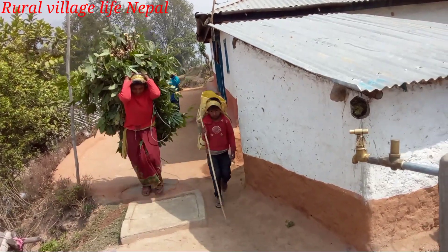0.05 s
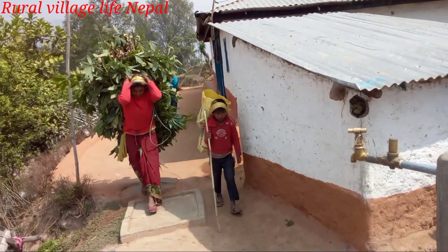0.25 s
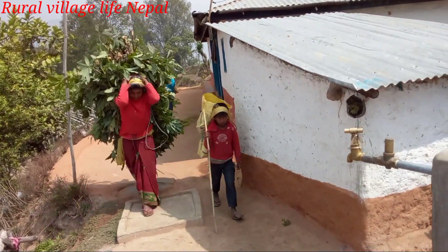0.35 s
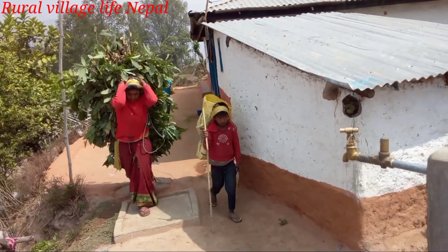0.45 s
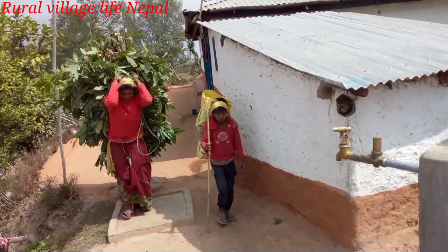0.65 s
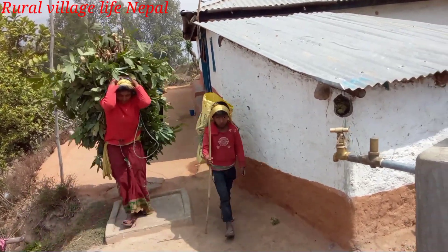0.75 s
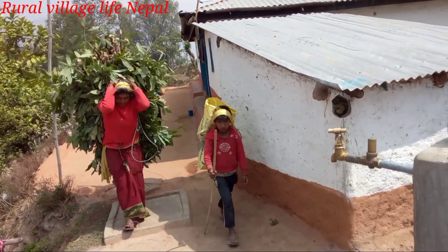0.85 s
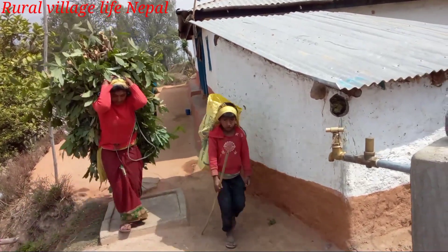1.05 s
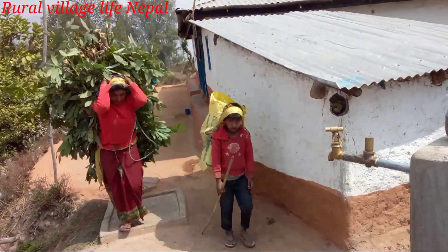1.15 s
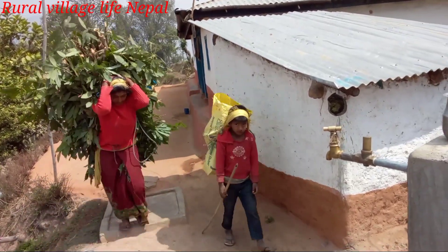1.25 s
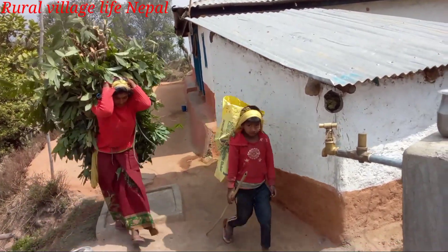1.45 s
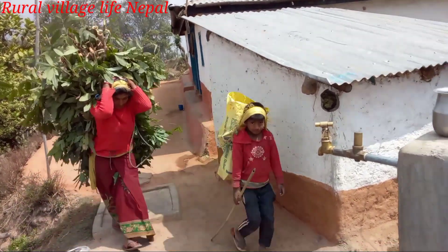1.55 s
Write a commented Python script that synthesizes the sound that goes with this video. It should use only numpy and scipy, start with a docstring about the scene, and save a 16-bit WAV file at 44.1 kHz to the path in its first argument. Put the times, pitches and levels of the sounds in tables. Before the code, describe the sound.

A goat gives one long, high, quavering bleat in a quiet village yard, and a lower, farther goat joins softly as it ends. Sandals slap and scuff on a gritty path, and soft low bumps hit the microphone.

```python
"""Two goats in a village yard.

A goat gives one long, high, quavering bleat, ten throbs a second, its vocal folds buzzing through a mouth
that opens and closes again; a second, lower goat joins in softly as it ends. House walls throw the calls
back. Feet slap and scuff on the gritty path, and soft low buffets hit the microphone in the quiet air."""
import sys
import numpy as np
from scipy import signal
from scipy.fft import rfft, irfft, next_fast_len
from scipy.io import wavfile

SR = 44100
rng = np.random.default_rng(int(sys.argv[2]) if len(sys.argv) > 2 else 0)


def dump_mix(stems):
    """Bounce the given channels to the path in sys.argv[1] as a 16-bit WAV at rate SR."""
    frames = np.atleast_2d(stems).T  # one column per channel
    limited = np.clip(frames, -1, 1)  # hard clip at full scale
    pcm = np.round(limited * 32767).astype(np.int16)
    wavfile.write(sys.argv[1], SR, pcm)


N = 68355
T = np.arange(N) / SR
SIZE = next_fast_len(N + SR // 2)
HZ = np.maximum(np.arange(SIZE // 2 + 1) * SR / SIZE, 1)
CUTOFF_HZ = 15500
JITTER_HZ = 294   # bandwidth of the pitch tremor in both voices


def from_db(db):
    """Decibels to gain."""
    return 10 ** (np.asarray(db) / 20)


def colour_db(points, hz=HZ):
    """A spectrum in dB, its points joined by straight lines in log frequency."""
    f, db = np.transpose(points)
    return np.interp(np.log(hz), np.log(f), db)


def shape(x, db):
    """Causal (minimum-phase) filter with the given gains; the result has rms 1."""
    cepstrum = irfft(db * np.log(10) / 20, SIZE)
    cepstrum[1:SIZE // 2] *= 2
    cepstrum[SIZE // 2 + 1:] = 0
    y = irfft(rfft(x, SIZE) * np.exp(rfft(cepstrum)), SIZE)[:N]
    return y / y.std()


def noise(points, hz=HZ):
    """Coloured noise, rms 1."""
    return shape(rng.standard_normal(N), colour_db(points, hz))


def drift(hz):
    """Random wander below the given rate, spread 1."""
    y = signal.sosfilt(signal.butter(2, hz, fs=SR, output="sos"), rng.standard_normal(N))
    return y / y.std()


def swell(s, width):
    """A bell-shaped rise and fall around second s."""
    return np.exp(-.5 * ((T - s) / width) ** 2)


def strikes(rows):
    """Envelope of blows: instant attack, exponential decay."""
    return sum(from_db(db) * (T >= s) * np.exp(-np.maximum(T - s, 0) / decay) for s, db, decay in rows)


def background():
    """Still outdoor air, a faint rustle of leaves and low rumble on the microphone."""
    # Spectra of the three beds. Each row: frequency in Hz, level in dB.
    air_colour = [(20, -26), (60, 5.5), (150, -14), (290, -9), (420, -16), (1400, -16), (3000, -20.5),
                  (8000, -34.5), (15500, -29.5)]
    leaf_colour = [(300, 16.5), (900, 7.5), (1400, 5), (2000, 7.5), (4000, 10), (7000, -8), (15500, -9)]
    rumble_colour = [(20, -20), (45, 11.5), (65, 11), (130, -10), (220, -31), (500, -45), (2000, -83)]
    # How leaves and rumble rise and fall. Each row: time in seconds, level in dB.
    leaf_levels = [(0, -116), (.3, -64), (.6, -54), (1.1, -55), (1.55, -56)]
    rumble_levels = [(0, -74), (.2, -75), (.5, -50.5), (.85, -45.5), (1.05, -53.5), (1.25, -86),
                     (1.55, -64)]
    air = from_db(-60) * noise(air_colour)
    leaves = from_db(np.interp(T, *np.transpose(leaf_levels))) * noise(leaf_colour)
    rumble = from_db(np.interp(T, *np.transpose(rumble_levels))) * noise(rumble_colour)
    return air + leaves + rumble


def buffets():
    """Short, dull bumps right on the microphone: a wavering low swing in noise."""
    # Each row: crest in seconds, level at the crest in dB, half-length in seconds, centre in Hz.
    bumps = [(0.223, -44.5, 0.026, 73.9), (.258, -20.5, 0.012, 112.8), (0.306, -36.5, 0.012, 133.2),
             (0.363, -17.5, .015, 125), (0.396, -34.5, 0.051, 110.7), (0.481, -26, 0.0086, 73.26),
             (0.593, -29.5, 0.011, 120), (0.623, -31.5, 0.034, 90), (0.688, -30, 0.012, 105),
             (0.839, -36, 0.024, 106.4), (1.002, -44.5, 0.014, 129.7), (1.153, -39, 0.031, 89.5),
             (1.522, -49, 0.02, 62.7)]
    # Spectrum of the noise. Each row: multiple of the centre frequency, level in dB.
    bump_colour = [(.2, -61), (.5, -14.5), (1, -5), (1.5, -15.5), (2.4, -16), (3.8, -33.5), (6, -53),
                   (30, -107)]
    out = 0
    waver = np.exp(.25 * drift(hz=48.4))
    for s, db, length, hz in bumps:
        envelope = swell(s, length)
        swing = np.sqrt(2) * np.sin(2 * np.pi * (hz * np.cumsum(waver) / SR + rng.random()))
        burst = envelope * (swing + from_db(-1) * noise(bump_colour, HZ / hz))
        out += from_db(db) * burst * np.linalg.norm(envelope) / np.linalg.norm(burst)
    return out


def footfalls():
    """A sandal slaps down, grit snaps and light taps ring on the path; each dies at once."""
    # Slaps and snaps. Each row: start in seconds, level in dB, decay in seconds.
    slap_hits = [(.3998, -27.5, 0.0072), (.407, -35, 0.0046), (.4168, -30, 0.0022)]
    snap_hits = [(.136, -75, .002), (.155, -47, 0.0015), (.657, -40.5, 0.0022), (1.147, -45, 0.0036),
                 (1.425, -53.5, 0.007), (1.436, -71, .003)]
    # Their spectra. Each row: frequency in Hz, level in dB.
    slap_colour = [(300, -22), (800, -6.5), (1700, -9), (2150, -1), (2500, 9), (3100, -1), (5000, -7),
                   (8000, -27), (10500, -15.5), (15500, -31)]
    snap_colour = [(700, -11), (1500, 8.5), (5000, -1.5), (7000, -1), (10000, -4), (15000, -9)]
    # Taps. Each row: start in seconds, level in dB, ring in Hz.
    tap_hits = [(.154, -53.5, 970), (0.297, -50, 1230)]
    # Spectrum of a tap. Each row: multiple of the ring frequency, level in dB.
    tap_colour = [(.4, -32), (.8, -20), (1, 3), (1.25, -22), (3, -33)]
    tap_decay_s = .0034
    slaps = noise(slap_colour) * strikes(slap_hits)
    snaps = noise(snap_colour) * strikes(snap_hits)
    taps = sum(noise(tap_colour, HZ / hz) * strikes([(s, db, tap_decay_s)]) for s, db, hz in tap_hits)
    return slaps + snaps + taps


def scuffs():
    """Soles drag over the gritty path: short, flat-topped strokes of grainy noise."""
    # Each row: middle in seconds, level in dB, half-length in seconds.
    strokes = [(0.42, -43.5, 0.023), (0.469, -47, 0.025), (0.901, -41, 0.019), (0.943, -36, 0.025)]
    # Spectrum of the scrape. Each row: frequency in Hz, level in dB.
    scrape_colour = [(250, -12.5), (380, 6.5), (560, -7.5), (900, -9.5), (1600, 2.5), (2400, 9.5),
                     (4000, 2.5), (6000, -4), (8000, -8), (12000, -4), (15500, -12.5)]
    envelope = sum(from_db(db) / (1 + ((T - s) / length) ** 10) for s, db, length in strokes)
    return noise(scrape_colour) * from_db(.5 * drift(hz=398)) * envelope


def yard(call, tail_db):
    """A call reaches the microphone directly, off the house walls and as a short diffuse tail."""
    # Wall echoes. Each row: delay in seconds, level in dB.
    echoes = [(.0115, -14), (.021, -14.5), (.043, -44)]
    t60_s, hollow_delay_s, hollow_band_hz = .33, .028, (580, 872)
    tail = rng.standard_normal(N) * from_db(-60 * T / t60_s) * (T > echoes[0][0])
    response = from_db(tail_db) * tail / np.linalg.norm(tail)
    for s, db in echoes:
        response[int(s * SR)] += from_db(db)
    # One stronger reflection sounds hollow.
    band = signal.butter(2, hollow_band_hz, "band", fs=SR, output="sos")
    bounce = signal.unit_impulse(N, int(hollow_delay_s * SR)) + 1e-18
    response += from_db(-6) * signal.sosfilt(band, bounce)
    return call + signal.fftconvolve(call, response)[:N]


def folds(pitch):
    """Vocal-fold pulses: all harmonics at equal strength."""
    phase = 2 * np.pi * np.cumsum(pitch) / SR
    count = int(CUTOFF_HZ / np.median(pitch))
    half = np.sin(phase / 2)
    return np.sin((count + .5) * phase) / np.where(half == 0, 1, half) - 1


def low_goat():
    """The farther goat, nearly an octave lower: throbs lift pitch and level; a nasal hum joins them."""
    # Each row: crest in seconds, top pitch in Hz, level in dB, half-length in seconds.
    throbs = [(1.079, 228, -44.5, 0.022), (1.175, 257.7, -40, 0.019), (1.274, 262, -43.5, 0.029),
              (1.366, 263.3, -43.5, 0.042), (1.469, 260, -44, 0.042)]
    # Spectra of its mouth and breath. Each row: frequency in Hz, level in dB.
    mouth_colour = [(250, -2.5), (520, 3.5), (780, 5), (1050, -12), (1550, -15.5), (2000, -17), (2300, 0),
                    (2600, -12), (2900, -11.5), (3250, 0.5), (3500, -14.5), (3950, -16.5), (4600, -48),
                    (5400, -18), (6500, -61), (15000, -63)]
    breath_colour = [(250, 11), (500, 18), (950, 26), (1200, -29), (1800, -2), (2300, -18), (2650, 3),
                     (3200, 2), (3500, -11), (4000, -2), (4700, -16), (5500, 3), (6500, -40), (15000, -31)]
    rest_hz, pitch_lag_s, jitter = 228, .00702, .006

    def level(spread):
        return sum(from_db(db - 11.5 * ((T - s) / (length * spread)) ** 2) for s, _, db, length in throbs)

    lift_hz = sum((hz - rest_hz) * swell(s + pitch_lag_s, width=.025) for s, hz, _, _ in throbs)
    pitch = (rest_hz + lift_hz) * (1 + jitter * drift(JITTER_HZ))
    tone = shape(folds(pitch), colour_db(mouth_colour)) + from_db(-19) * noise(breath_colour)
    hum = from_db(-4) * np.sin(2 * np.pi * np.cumsum(pitch) / SR)
    return tone * level(spread=1) + hum * level(spread=1.14)


def arch(s, length):
    """Pitch factor: highest on the crest of a throb, drooping more after it than before."""
    sag = np.where(T < s, .07, .1246)
    return 1 - sag * np.tanh(.5 * ((T - s) / length) ** 2)


def ripple_db(spread_db=3.5, spacing_hz=490):
    """A random ripple over frequency, so that each throb colours its partials a little differently."""
    return spread_db * np.interp(HZ / spacing_hz, np.arange(200), rng.standard_normal(200))


def high_goat():
    """The nearer goat: clear throbs coloured by the opening mouth, rasping and breathy at both ends."""
    # Each row: crest in seconds, top pitch in Hz, level in dB, mouth opening from 0 to 1,
    # treble lift in dB, roughness as a share of pitch, half-length in seconds.
    throbs = [(0.493, 424, -47.5, 0.43, 3, .003, 0.02), (.576, 449.7, -42, 0.39, 6.5, 0.0034, 0.019),
              (0.67, 460.7, -31, 0.84, 4, 0.0017, 0.024), (0.765, 464.2, -28, 0.82, 4.5, 0, 0.022),
              (0.861, 466.6, -28, 0.89, 6, 0.0032, 0.026), (0.962, 460.7, -27, 0.89, 6.5, 0.003, .023),
              (1.065, 450.8, -29.5, 0.71, 6, 0.0029, .022), (1.171, 423.6, -36, 0.67, 12, .005, .025)]
    # Spectra of the open mouth, the shut mouth and the breath. Each row: frequency in Hz, level in dB.
    mouth_open = [(450, -20), (920, 6.5), (1380, -10), (1850, -8.5), (2300, -4), (2770, -1), (3220, 5.5),
                  (3680, 5), (4100, -18.5), (4600, -12), (5100, -43), (5550, -24), (6400, -46.5),
                  (7400, -33), (8300, -55), (8800, -32), (9700, -64), (11000, -39), (15000, -51)]
    mouth_shut = [(430, -0.5), (900, -13.5), (1330, 6), (1750, 22), (2200, -7), (3100, -51), (3600, 6),
                  (4100, -32), (4700, -5.5), (5500, -10.5), (7000, -21), (15000, -93)]
    breath_colour = [(300, -29), (900, 2), (1500, 5), (2100, 0.5), (2600, 15.5), (3100, -24), (3750, 12),
                     (4500, 3), (5700, -3), (6700, -15), (9000, -19), (15000, -33)]
    flank_db, flank_power = 16, 3.44   # drop one half-length from the crest, and its steepness
    pitch_lead_s, base_jitter, flank_jitter, rasp_jitter = .0013, .0012, .0086, .015
    rasp_before_s, rasp_after_s, rasp_width_s = .025, .018, .0082
    treble = np.interp(HZ, (4700, 3790), (0, 1))
    breath = noise(breath_colour)
    wander, rattle = drift(JITTER_HZ), drift(JITTER_HZ)
    out = 0
    for s, hz, db, opening, lift_db, roughness, length in throbs:
        away = np.minimum(abs(T - s) / length, 10)   # half-lengths from the crest
        jitter = base_jitter + roughness + flank_jitter * np.minimum(away, 1) ** 2
        pitch = hz * arch(s - pitch_lead_s, length) * (1 + wander * jitter)
        bright_db = lift_db * treble
        mouth_db = opening * colour_db(mouth_open) + (1 - opening) * colour_db(mouth_shut)
        tone = shape(folds(pitch), mouth_db + bright_db + ripple_db())
        tone *= from_db(-flank_db * away ** flank_power)
        # The folds rattle as a throb starts and stops.
        rasp = shape(folds(pitch * (1 + rasp_jitter * rattle)), colour_db(breath_colour) + bright_db)
        rasp *= .7 * swell(s - rasp_before_s, rasp_width_s) + swell(s + rasp_after_s, rasp_width_s)
        # Breath spreads wider than the tone and clears on the crest.
        air = breath * from_db(-33 - flank_db * (away / 4.8) ** flank_power)
        air *= 1 - swell(s, .75 * length)
        out += from_db(db) * (tone + from_db(-7.5) * rasp + air)
    return out


def scene():
    """One microphone in the yard: two goats, feet on the path and the open air."""
    goats = yard(high_goat(), tail_db=-18.5) + yard(low_goat(), tail_db=-14)
    return (goats + footfalls() + scuffs() + buffets() + background())[None]


def record(dry):
    """A steep low-pass cuts the highest treble."""
    return signal.sosfilt(signal.ellip(10, .1, 80, CUTOFF_HZ, fs=SR, output="sos"), dry)


dry = scene()
out = record(dry)
dump_mix(out)
```